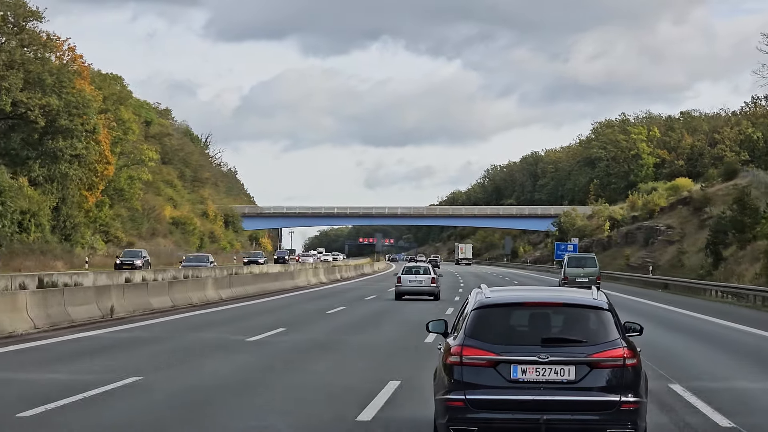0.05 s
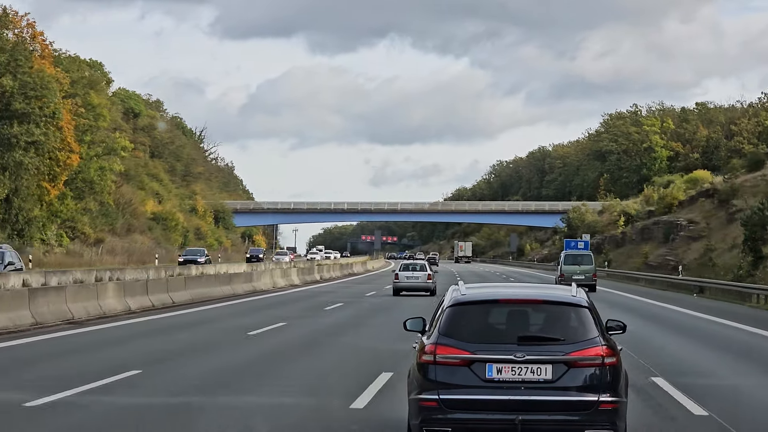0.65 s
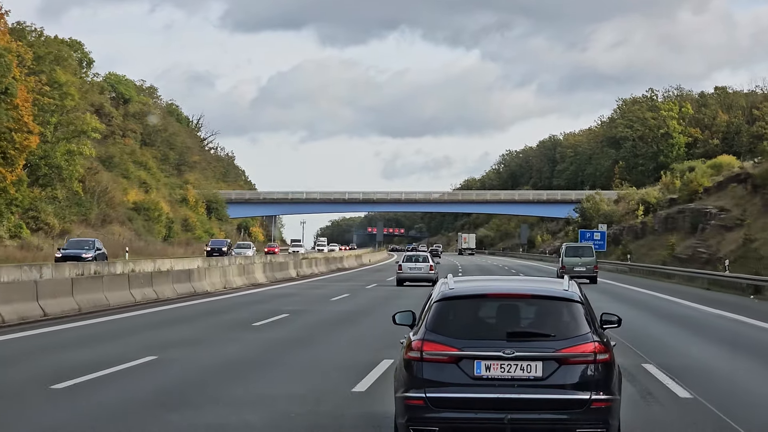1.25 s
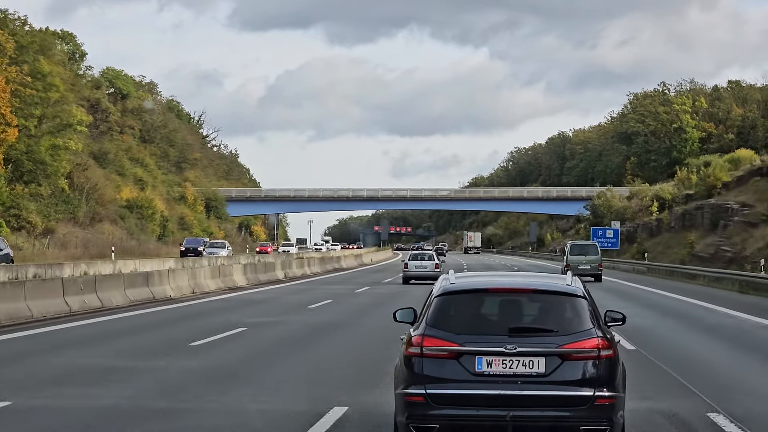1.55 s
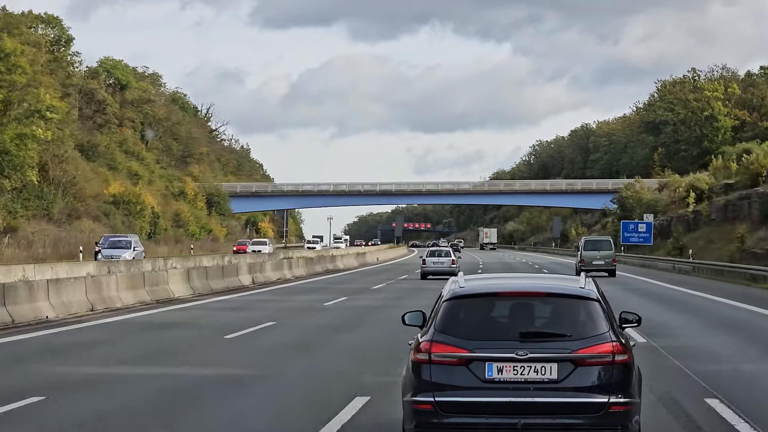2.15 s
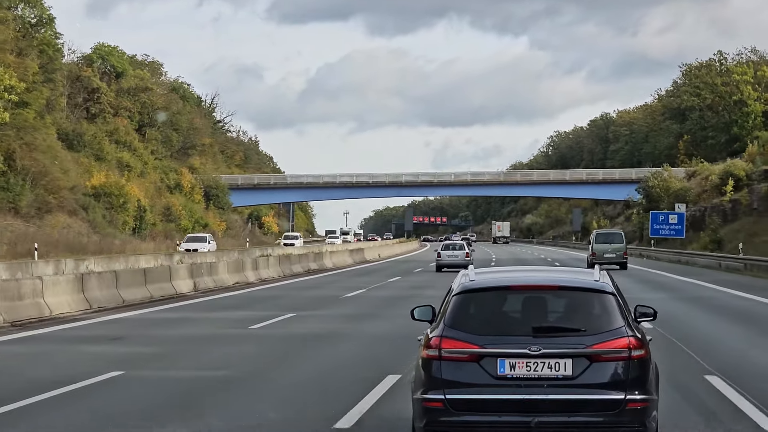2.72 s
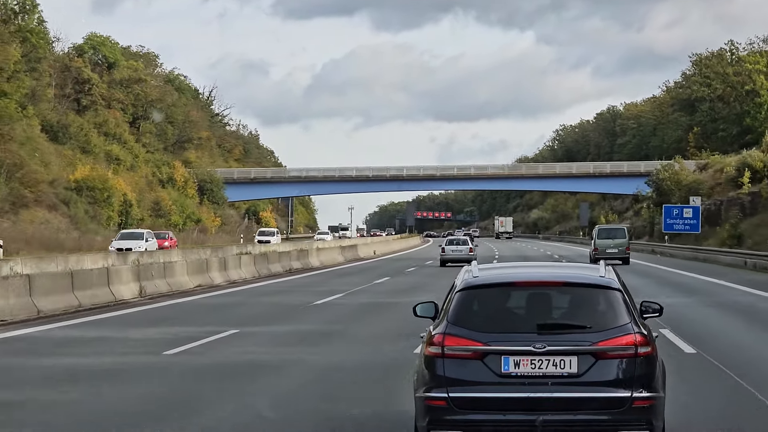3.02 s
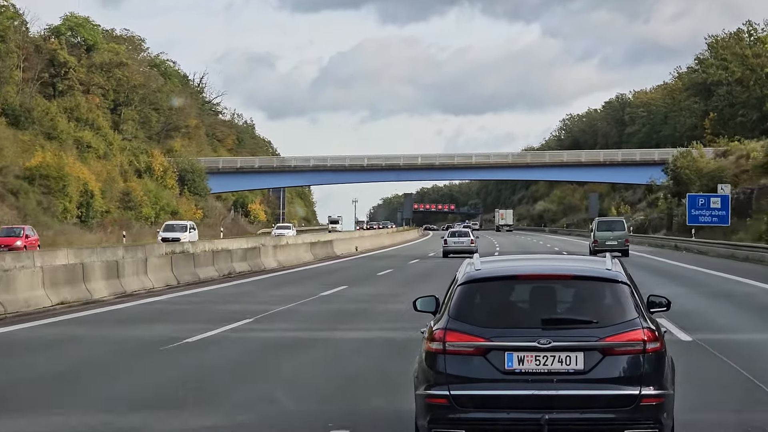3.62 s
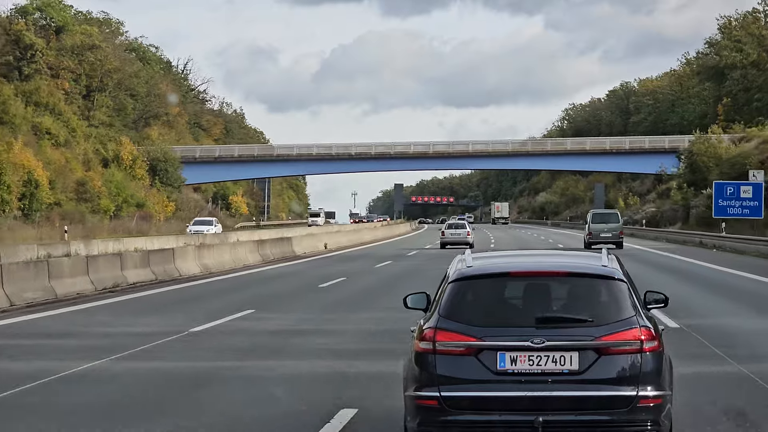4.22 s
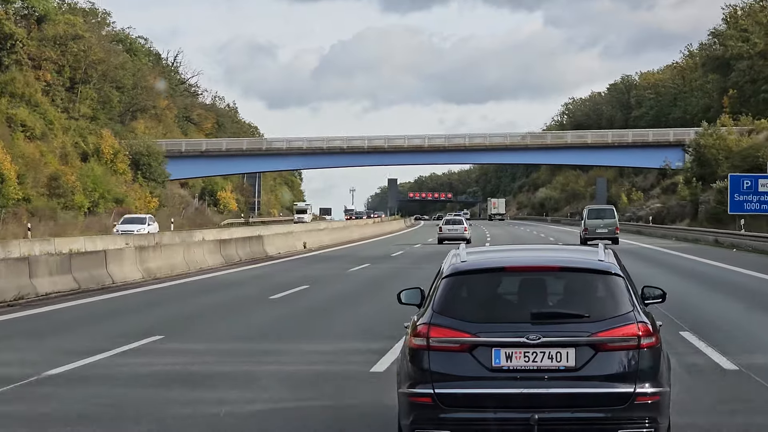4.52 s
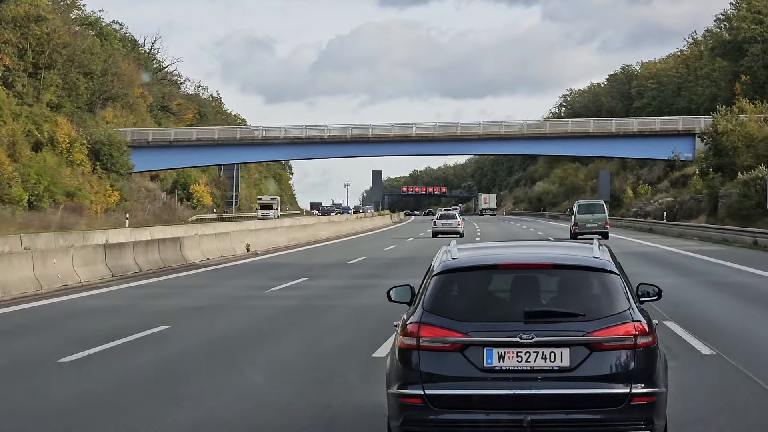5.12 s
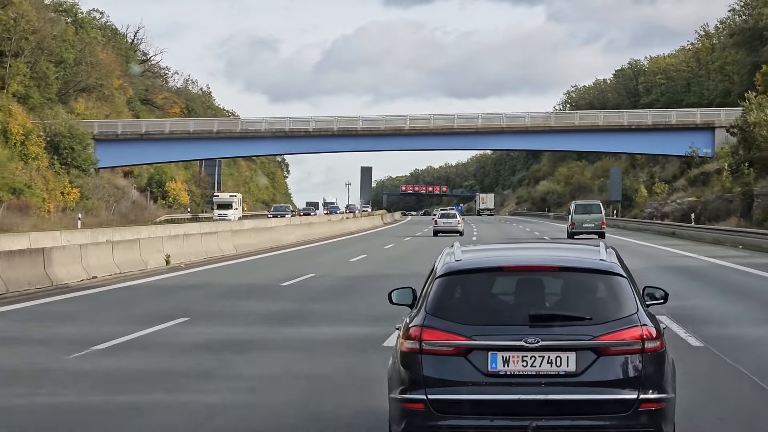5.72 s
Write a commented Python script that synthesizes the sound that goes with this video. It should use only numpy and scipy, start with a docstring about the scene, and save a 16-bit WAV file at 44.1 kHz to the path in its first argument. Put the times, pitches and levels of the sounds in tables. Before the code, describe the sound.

A car's cabin booms and hums at motorway speed, with faint wind, light cloth rustling and occasional small clicks nearby.

```python
"""Road rumble inside a car cruising on a motorway: the road shakes the body and booms in the cabin.
Each wheel turn repeats the same tyre bumps as a comb of hum lines, with a drive-train whine above.
Tyre roar and wind come through the glass, cloth rustles and something small ticks near the microphone.
A limiter holds down the loudest bass peaks."""
import sys
import numpy as np
from scipy import signal
from scipy.fft import rfft, irfft
from scipy.io import wavfile
from scipy.ndimage import uniform_filter1d, minimum_filter1d

SR = 44100
rng = np.random.default_rng(int(sys.argv[2]) if len(sys.argv) > 2 else 0)


def dump(signal):
    """Clip the signal to [-1, 1] and save it as 16-bit WAV at the path in sys.argv[1]."""
    limited = np.clip(np.atleast_2d(signal).T, -1, 1)
    pcm = np.round(limited * 32767).astype(np.int16)
    wavfile.write(sys.argv[1], SR, pcm)


N = 254016
TIME = np.arange(N) / SR
FREQ = np.maximum(np.arange(N // 2 + 1) * SR / N, 1)


def undb(db):
    """Decibels to gain."""
    return 10 ** (np.asarray(db) / 20)


def unit(x):
    """Scale to rms 1."""
    return x / np.sqrt(np.mean(x ** 2))


def even(x, span_s):
    """Hold the rms over span_s near 1: slow swells go, quick flutter stays."""
    return x / np.sqrt(uniform_filter1d(np.mean(x ** 2, axis=0), int(span_s * SR)))


def curves(table):
    """Automation lanes: a table's columns joined by straight lines in time."""
    times, *columns = np.transpose(table)
    return [np.interp(TIME, times, column) for column in columns]


def swell(centre_s, half_width_s):
    """A bell-shaped envelope of height 1."""
    return np.exp(-np.minimum(((TIME - centre_s) / half_width_s) ** 2 / 2, 20))


def decay(age, t60_s):
    """An envelope that falls 60 dB in t60_s."""
    return np.exp(-np.log(1000) * age / t60_s)


def drift(rate_hz):
    """Smooth random modulation with a spread of about 1."""
    steps = rng.standard_normal(int(2 * rate_hz * N / SR) + 4)
    smooth = signal.resample_poly(steps, 16, 1)
    return np.interp(TIME * 2 * rate_hz + 1, np.arange(len(smooth)) / 16, smooth)


def across(points):
    """(Hz, value) points joined on a log-frequency axis."""
    hz, value = np.transpose(points)
    return np.interp(np.log(FREQ), np.log(hz), value)


def colour(points):
    """EQ gain through (Hz, dB) points, rolling off steeply beyond both ends."""
    beyond = np.minimum(1, np.minimum(FREQ / points[0][0], points[-1][0] / FREQ))
    return undb(across(points)) * beyond ** 6


# Stereo image of the cabin: freq_hz, correlation
CABIN_IMAGE = [(100, 0.97), (220, 0.97), (295, 0.72), (380, 0.75), (470, 0.59), (650, .78), (900, 0.32),
               (1100, -0.12), (1500, -0.69), (2100, 0.041), (6000, -0.13), (9000, 0.57)]


def noise(gain, pan_db=0, image=CABIN_IMAGE):
    """Mid/side noise of the given density per root Hz; pan_db is left minus right."""
    alike = np.clip(across(image), -1, 1)
    mid, side = rfft(rng.standard_normal((2, N))) * np.sqrt([(1 + alike) / 2, (1 - alike) / 2])
    pair = np.array([(mid + side) * undb(pan_db / 2), (mid - side) * undb(-pan_db / 2)])
    return irfft(pair * gain, N) * np.sqrt(SR / 2)


def reflections(share, t60_s):
    """Early echoes off the glass put a fine, fixed ripple on a spectrum."""
    tail = rng.standard_normal(N) * decay(TIME, t60_s)
    return 1 + share * rfft(tail / np.linalg.norm(tail))


# Airflow EQ: freq_hz, level_db
WIND_EQ = [(900, -80), (1130, -73), (1330, -69.2), (1750, -73.9), (2100, -76.4), (2400, -79.3),
           (2750, -77.8), (3250, -82.7), (4200, -82.3), (4900, -91), (6200, -94.3), (8300, -110.5),
           (16000, -112.3)]
# Resonances of glass and door seals: pitch_hz, width_hz, level_db
SEAL_WHISTLES = [(767, 20, -63), (827.6, 20, -62.5), (983, 40, -65.5), (1310, 50, -70), (1410, 90, -71),
                 (1665, 90, -72), (1910, 80, -78.5), (2945, 170, -76.5), (3610, 100, -78.5),
                 (3900, 90, -81.5), (7380, 500, -100)]
# Wind placement, brighter on the right: freq_hz, left_minus_right_db
WIND_BALANCE = [(1000, -1.3), (3000, 0), (3600, -4), (4200, 0), (5500, -6), (7300, -7), (8500, 2.5)]
# Ride on the wind's treble: time_s, gain_db
WIND_TREBLE_RIDE = [(0, .6), (4, .5), (4.6, -1.2), (5.4, -1.4), (5.76, -.3)]


def wind(gust_db=0.96):
    """Air rushes over the glass and whistles faintly in the seals; its treble eases late on."""
    seal_power = sum(undb(db) ** 2 / (1 + (2 * (FREQ - hz) / width) ** 2) ** 2
                     for hz, width, db in SEAL_WHISTLES)
    ripple = reflections(share=.19, t60_s=.06)
    air = noise(ripple * np.sqrt(colour(WIND_EQ) ** 2 + seal_power), across(WIND_BALANCE))
    treble = signal.sosfiltfilt(signal.butter(2, 3000, "high", fs=SR, output="sos"), air)
    treble_gain = undb(curves(WIND_TREBLE_RIDE)[0])
    return (air + (treble_gain - 1) * treble) * undb(gust_db * drift(5.1))


# Stereo image of close rubbing: freq_hz, correlation
RUB_IMAGE = [(2400, .05), (4400, 0.48), (8000, 0.41)]


def close_rubbing(eq, pan_db=-3.0):
    """Spectrum of a rubbing noise close by on the right."""
    balance = across([(7000, pan_db), (9000, pan_db / 2)])
    return rfft(noise(colour(eq), balance, RUB_IMAGE))


def friction(rubbing, tilt_db):
    """Rubbing noise of rms 1; a firmer contact tilts it darker."""
    return unit(irfft(rubbing * undb(tilt_db * np.log2(FREQ / 8000)), N))


# Cloth EQ: freq_hz, level_db
CLOTH_EQ = [(1100, 2), (1380, 11), (1700, 3), (2300, 6), (3000, 8), (3900, 9), (4800, 8), (6000, 9),
            (7400, 6), (8500, 0), (10800, -1), (11600, 4.5), (12600, 1), (14200, 3), (16000, 0)]
# Cloth strokes: centre_s, half_width_s, level_db, tilt_db_per_octave, swish_hz
CLOTH_STROKES = [(.05, .028, -53.5, 2, 5600), (.272, .033, -47.8, -2, 5500), (.4, .17, -55.5, -1, 5800),
                 (.553, .034, -48.3, -4.2, 5750), (2.025, .2, -63.5, 3.5, 5600),
                 (2.33, .05, -44.3, -2, 2950), (2.374, .02, -48, -1.5, 5400), (2.5, .08, -60.5, 2, 5600),
                 (2.88, .12, -57, -1, 6200), (3.516, .13, -65, 10, 11600), (3.993, .06, -57, -2, 5600)]


def rustle(swish_db=6, swish_width_hz=600, grain_db=1.5):
    """Cloth rubs in soft strokes, each with its own swish and a fine grain of slipping fibres."""
    rubbing, out = close_rubbing(CLOTH_EQ), 0
    for centre, half_width, db, tilt, hz in CLOTH_STROKES:
        swish = undb(swish_db / (1 + (2 * (FREQ - hz) / swish_width_hz) ** 2))
        fibres = np.roll(friction(rubbing * swish, tilt), rng.integers(N), axis=1)
        out = out + undb(db) * fibres * swell(centre, half_width)
    return out * undb(grain_db * drift(180))


# Hollow ring of a tick: pitch_hz, t60_s, relative_db
RING_MODES = [(2120, .09, -2), (2400, .07, -2), (2900, .07, -1.5), (3570, .06, 4.5), (4100, .07, 5),
              (5030, .04, -8), (5730, .04, -8), (7370, .05, -7)]


def ring(age, tilt_db):
    """The struck object's modes, stronger under firm contact, with their own phase in each channel."""
    pitches, t60s, db = np.transpose(RING_MODES)
    gains = undb(db + tilt_db * np.log2(pitches / 8000)) / np.linalg.norm(undb(db))
    phases = rng.random((len(pitches), 2, 1))
    return np.sqrt(2) * sum(gain * decay(age, t60) * np.cos(2 * np.pi * (hz * age + phase))
                            for hz, t60, gain, phase in zip(pitches, t60s, gains, phases))


# Scratch EQ: freq_hz, level_db
SCRATCH_EQ = [(1300, 0), (2100, 9), (3000, 9), (4100, 13), (4800, 7.5), (5600, 8.5), (6700, 4), (7400, 7),
              (8500, 1), (10300, -2), (11500, 6), (13000, 1), (16000, 2)]
# Tick cues: start_s, level_db, attack_s, scratch_t60_s, tilt_db_per_octave, ring_mix_db
TICK_CUES = [(1.183, -51, .003, .06, 5, -15), (1.28, -58, .003, .14, 6, -15),
             (2.248, -34.8, .0025, .05, -1, -14), (2.613, -29.6, .0026, .062, -4, -4.5),
             (2.633, -43, .003, .06, -3, -8), (3.365, -48.5, .002, .08, 11, -15),
             (3.522, -53, .004, .08, 9, -15), (3.729, -43, .006, .07, -3, -12),
             (3.739, -41, .0025, .06, .5, -9), (3.752, -53, .008, .18, -1, -12)]


def ticks():
    """Something small catches and knocks: a scratch and a hollow ring, short in the padded cabin."""
    rubbing, out = close_rubbing(SCRATCH_EQ), np.zeros((2, N))
    age = np.arange(int(.25 * SR)) / SR
    for start, db, attack_s, t60, tilt, ring_db in TICK_CUES:
        span = slice(int(start * SR), int(start * SR) + len(age))
        scratch = friction(rubbing, tilt)[:, span] * decay(age, t60)
        attack = 1 - np.exp(-age / attack_s)
        out[:, span] += undb(db) * (scratch + undb(ring_db) * ring(age, tilt)) * attack
    return out


# Cruising speed: time_s, wheel_rate_hz
WHEEL_SPEED = [(0, 19.31), (1, 19.34), (2.5, 19.3), (3.5, 19.26), (4.5, 19.17), (5.76, 19.03)]
WHEEL_HZ = curves(WHEEL_SPEED)[0]


def wheel_tone(order, waver, spread=0.93):
    """A multiple of the wheel rate at rms 1, wavering in level and phase, wider in stereo when high."""
    hz = order * WHEEL_HZ
    phase = 2 * np.pi * (np.cumsum(hz) / SR + rng.random()) + waver * drift(2.5)
    apart = spread * hz / 800 * (rng.choice([-1, 1]) + drift(2.0)) / 2
    level = 1 + waver * drift(2.5)
    return unit(level * np.cos(phase + np.array([apart, -apart])))


# Overtones that poke out of the comb: wheel_order, lift_db
OVERTONE_LIFTS = [(24, 3), (35, 4), (36, 6), (40, 4), (43, 2)]


def overtones(slip_rad=0.014):
    """The wheel's comb goes on above the hum, falling 12 dB an octave and blurred by tyre slip."""
    angle = 2 * np.pi * np.cumsum(WHEEL_HZ) / SR + slip_rad * drift(2.5)
    orders, lift_db = np.arange(23, 46), dict(OVERTONE_LIFTS)
    gains = [undb(lift_db.get(k, 0)) * (orders[0] / k) ** 2 for k in orders]
    return np.sqrt(2) * sum(gain * np.cos(k * angle + 2 * np.pi * rng.random())
                            for k, gain in zip(orders, gains))


# Faders for the whine here and the tyre hum below: time_s, hum_db, drive_db, tread_db
TONE_FADERS = [(0, -18, -52, -36.7), (1, -18.2, -52, -37), (1.7, -18.7, -46, -37.5),
               (1.95, -23, -44, -39.5), (2.4, -22, -42, -40.5), (2.85, -20, -40.5, -39),
               (3.1, -22, -37.3, -40), (3.65, -20.3, -34.3, -42), (4.5, -20.5, -34.8, -46),
               (5.4, -22.5, -36.7, -42), (5.76, -21.5, -48, -40)]


def whine(drive_order=27.92, tread_order=32, sideband_db=-7.0):
    """The drive train and the tread pattern each sing at a fixed ratio to the wheels."""
    _, drive_db, tread_db = curves(TONE_FADERS)
    drive = wheel_tone(drive_order, waver=.14)
    drive = unit(drive * (1 + .28 * drift(22)))  # roughened by road shake
    tread = wheel_tone(tread_order, waver=.24)
    sideband = undb(sideband_db) * wheel_tone(tread_order - 1, waver=.28)  # from uneven tread
    return drive * undb(drive_db) + (tread + sideband) * undb(tread_db)


# Hum lines, one per wheel order from the seventh up: relative_db
HUM_LINES = [-14.5, -6, -14.5, -5.5, -8, -11.5, -15.5, -17.5, -21.5, -24.5, -34.5, -30, -21.5, -19.5, -22,
             -32]
# Tyre roar EQ: freq_hz, level_db
ROAR_EQ = [(60, -53.5), (120, -41), (145, -49), (185, -42.5), (240, -46.5), (300, -50.5), (370, -54),
           (430, -58.5), (580, -59), (670, -60), (705, -65.5), (790, -63), (970, -65.5), (1100, -74)]


def tyres(hum_trim_db=-0.06, overtone_db=-49.5, throb=0.15):
    """Bumps that repeat every wheel turn hum; the asphalt's grain roars and throbs with the wheel."""
    hum = sum(undb(db) * wheel_tone(order, waver=.3) for order, db in enumerate(HUM_LINES, start=7))
    hum_db = curves(TONE_FADERS)[0] + hum_trim_db
    roar = noise(colour(ROAR_EQ), pan_db=.9) * (1 + throb * wheel_tone(order=1, waver=.11))
    return hum * undb(hum_db) + overtones() * undb(overtone_db) + roar


# Irregular swells of the sub-bass rumble: centre_s, half_width_s, level_db
RUMBLE_SWELLS = [(.116, 0.025, -10), (0.24, 0.056, -7.5), (0.444, 0.024, -5), (0.588, 0.041, -6.5),
                 (0.775, .018, -9), (.928, 0.024, -8.5), (1.216, 0.034, -9.5), (1.634, 0.017, -9),
                 (1.754, 0.047, -7.5), (1.964, 0.036, -3), (2.069, 0.023, -6.5), (2.222, 0.026, -5.5),
                 (2.412, 0.026, -6), (2.754, 0.028, -13), (3.073, 0.052, -6.5), (3.255, 0.035, -6),
                 (3.55, 0.059, -9), (3.906, .024, -8), (4.037, 0.029, -5), (4.214, .04, -4),
                 (4.393, 0.043, -8), (4.879, 0.043, -11.5), (5.046, 0.018, -10), (5.318, 0.082, -8.5),
                 (5.544, 0.02, -8)]
# Sub-bass EQ of the shaking body: freq_hz, level_db
SHAKE_EQ = [(16, -28), (23, 1), (27, 1), (32, -6), (37, -3.5), (47, -11)]


def body_shake(tremor_db=-17, trim_db=1.7):
    """The road shakes the body: a steady sub-bass tremor with irregular swells."""
    shake = even(noise(colour(SHAKE_EQ), pan_db=.4), span_s=.11)
    swell_power = sum((undb(db) * swell(centre, half_width)) ** 2
                      for centre, half_width, db in RUMBLE_SWELLS)
    return shake * np.sqrt(undb(tremor_db) ** 2 + swell_power) * undb(trim_db)


# Brief loud swells of the low cabin boom: centre_s, half_width_s, pitch_hz, level_db
BOOM_PEAKS = [(0.04, 0.025, 82, -6.5), (0.157, 0.013, 89, -7), (0.444, 0.014, 76, -5),
              (0.668, 0.011, 80, -5), (0.749, 0.016, 84, -4.5), (1.247, 0.012, 77, -6.5),
              (1.605, 0.021, 81, -8), (1.701, .018, 87, -6), (1.783, 0.018, 85, -5), (1.898, .019, 80, -3),
              (2.206, .013, 87, -9), (2.39, 0.029, 82, -9), (3.16, 0.016, 77, -6.5),
              (3.876, 0.013, 77, -5.5), (4.18, 0.012, 75, -9), (4.553, 0.017, 90, -3.5)]


def boom_peaks():
    """The cabin boom swells into a clean low tone for a few cycles at a time."""
    peaks = (undb(db) * swell(centre, half_width) * np.cos(2 * np.pi * (hz * TIME + rng.random()))
             for centre, half_width, hz, db in BOOM_PEAKS)
    return np.sqrt(2) * sum(peaks)


# EQ of the lowest cabin modes: freq_hz, level_db
BOOM_EQ = [(47, -8.5), (53, 7.5), (60, 2), (70, 1.5), (84, 1.5), (93, 8.5), (108, -5.5), (125, -10.5)]
# Slow rise and fall of the low boom: time_s, level_db
BOOM_FADER = [(0, -10.5), (1.1, -15), (1.8, -11.5), (2.6, -16.5), (3.5, -13), (4.8, -16), (5.76, -17)]


def cabin_boom(hum_db=-2.5, flutter_db=1.5, trim_db=1.1, duck_depth=.8):
    """The road rings the lowest cabin modes, a wheel order hums on one; the level flutters at random."""
    chatter = unit(noise(colour(BOOM_EQ), pan_db=.4))
    hum = undb(hum_db) * wheel_tone(order=4, waver=.53)
    level_db = curves(BOOM_FADER)[0] + flutter_db * drift(14) + trim_db
    on_peak = np.max([swell(centre, half_width) for centre, half_width, _, _ in BOOM_PEAKS], axis=0)
    duck = 1 - duck_depth * on_peak  # makes room for each peak's clean tone
    return even(chatter + hum, span_s=.22) * undb(level_db) * duck


def scene():
    """The mix at the microphone behind the windscreen, with a 6 ms fade-in."""
    fade_in = np.sin(np.pi / 2 * np.minimum(TIME / .006, 1)) ** 2
    return fade_in * (body_shake() + cabin_boom() + boom_peaks() + tyres() + whine() + wind()
                      + rustle() + ticks())


def record(dry, right_cut_hz=9, ceiling=.985, top_hz=15780):
    """The right port leaks a little bass; a look-ahead limiter ducks bass peaks; the top is cut."""
    right = signal.sosfilt(signal.butter(1, right_cut_hz, "high", fs=SR, output="sos"), dry[1])
    ports = np.array([dry[0], right])
    bass = signal.sosfiltfilt(signal.butter(2, 300, fs=SR, output="sos"), ports)
    excess = np.maximum(np.abs(ports) - ceiling, 0)
    gain = 1 - np.max(excess / np.maximum(np.abs(bass), .5), axis=0)
    hold = int(.012 * SR)
    held = minimum_filter1d(gain, hold)
    smoothed = uniform_filter1d(uniform_filter1d(held, hold // 2), hold // 2)
    limited = ports + (smoothed - 1) * bass
    return signal.sosfilt(signal.ellip(10, .1, 80, top_hz, fs=SR, output="sos"), limited)


dry = scene()
out = record(dry)
dump(out)
```